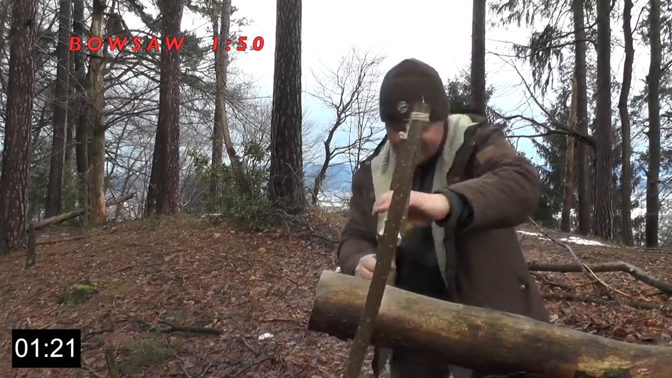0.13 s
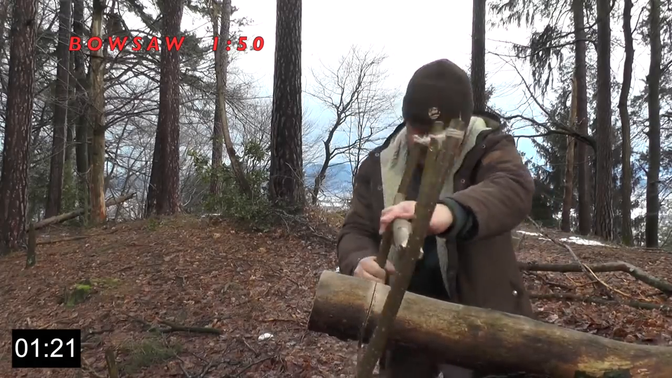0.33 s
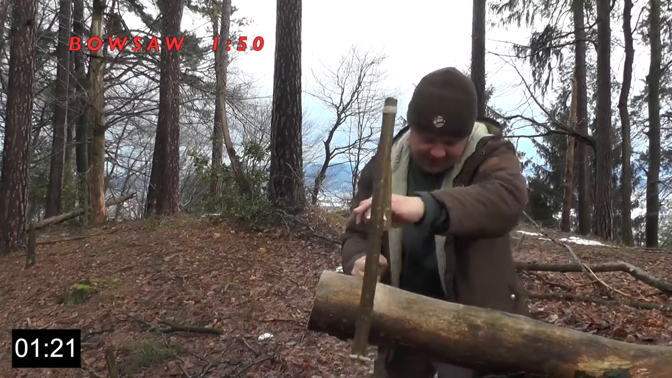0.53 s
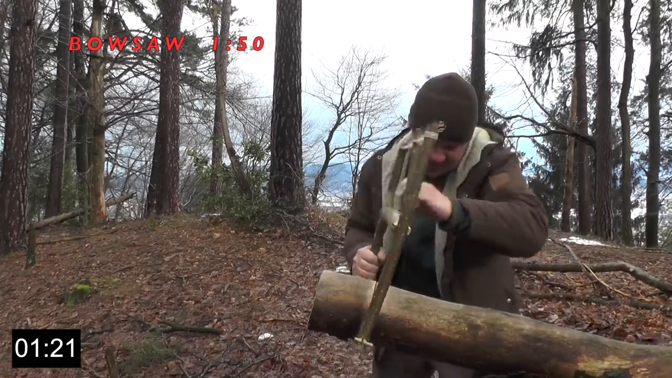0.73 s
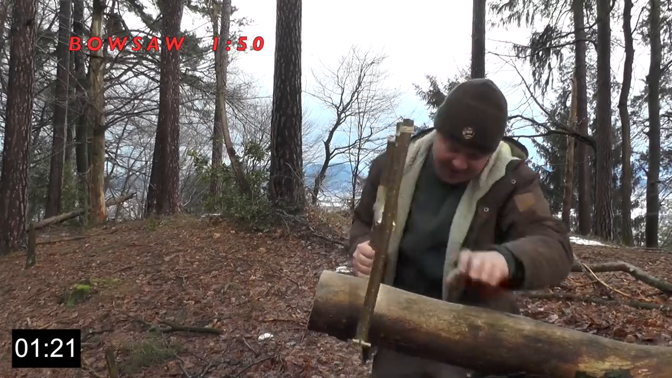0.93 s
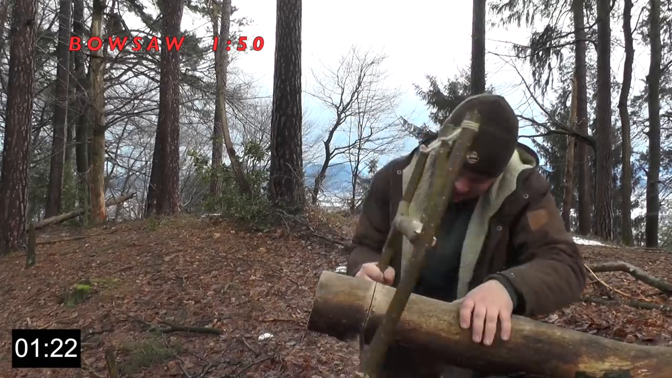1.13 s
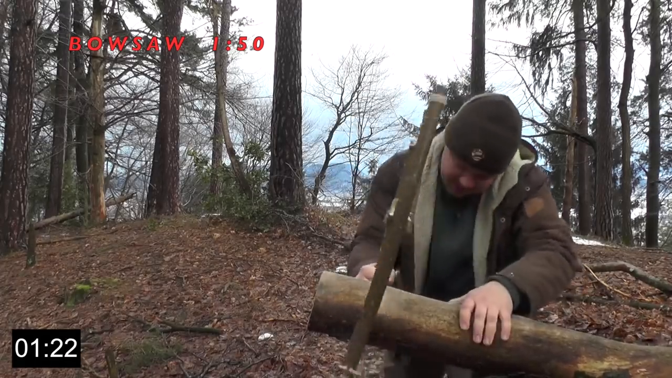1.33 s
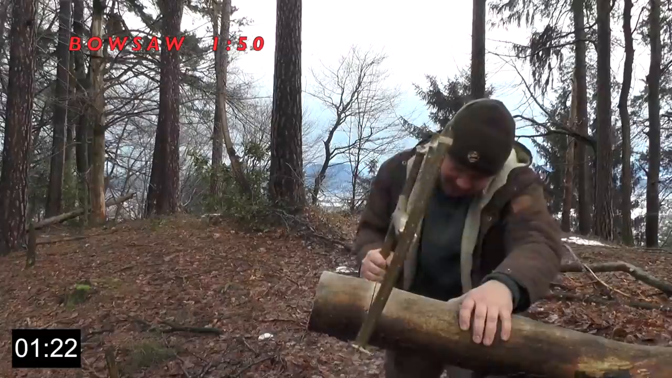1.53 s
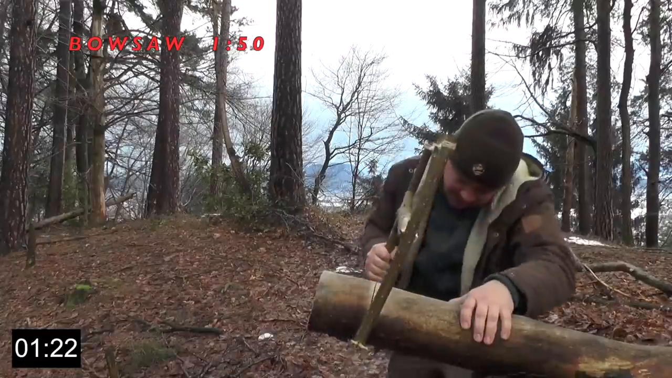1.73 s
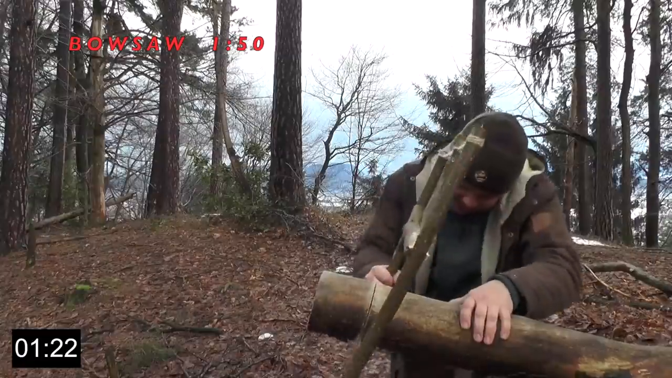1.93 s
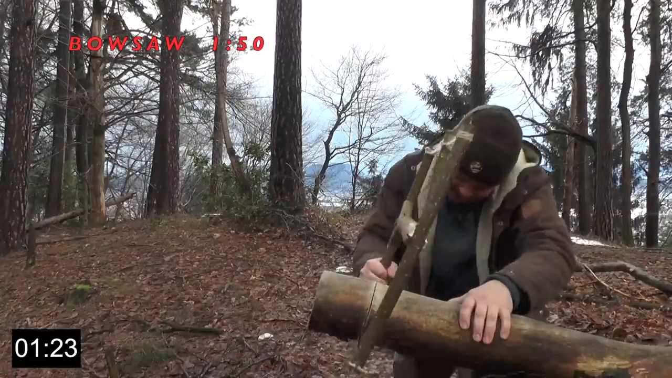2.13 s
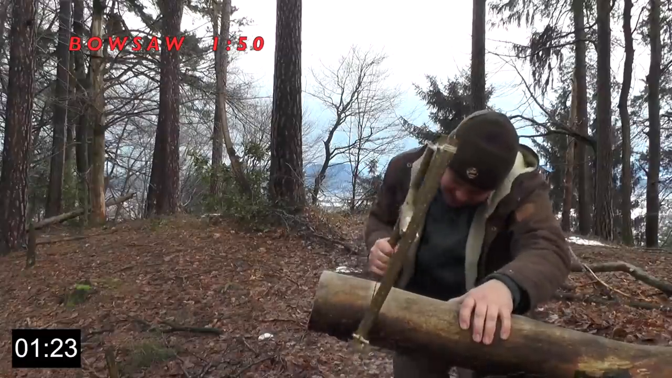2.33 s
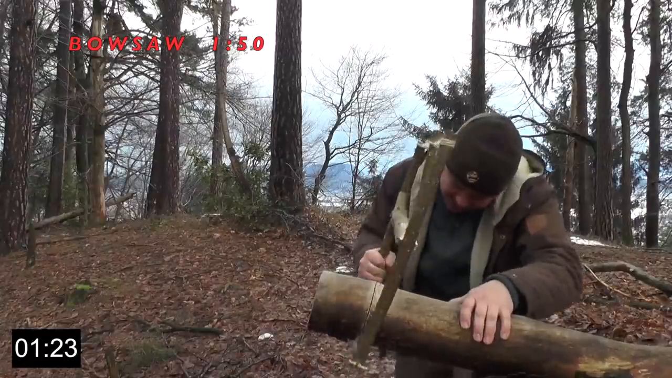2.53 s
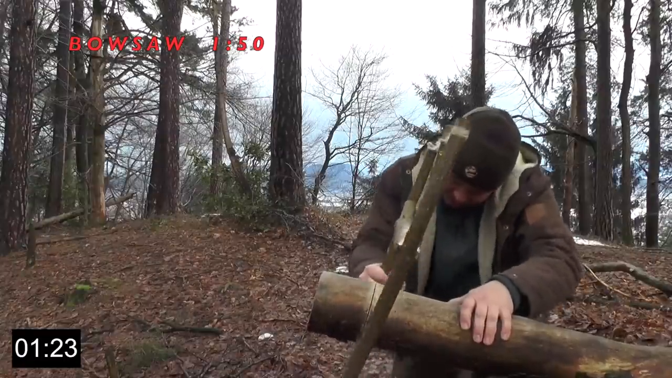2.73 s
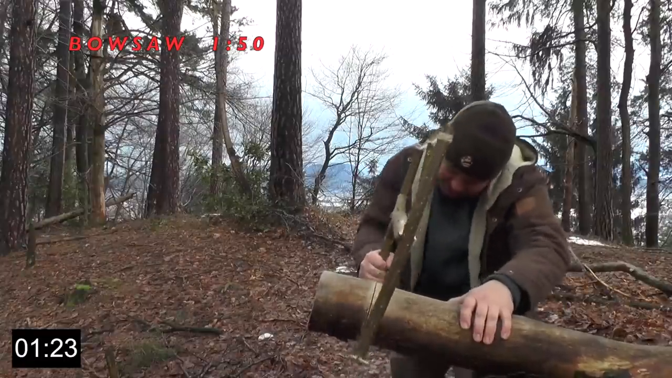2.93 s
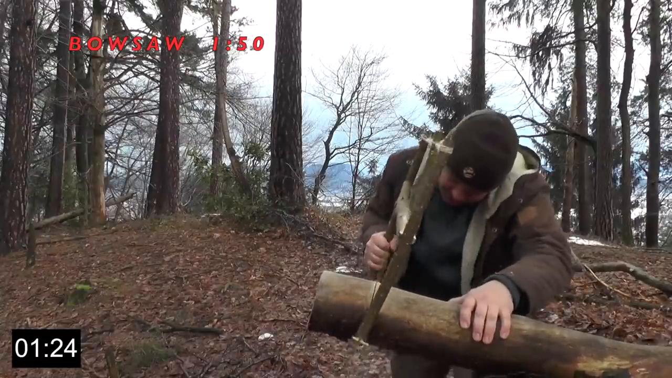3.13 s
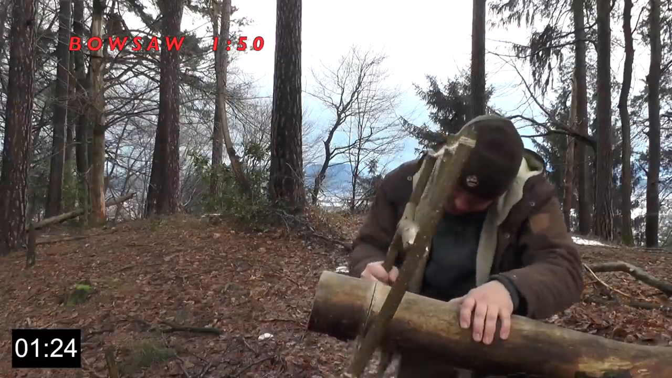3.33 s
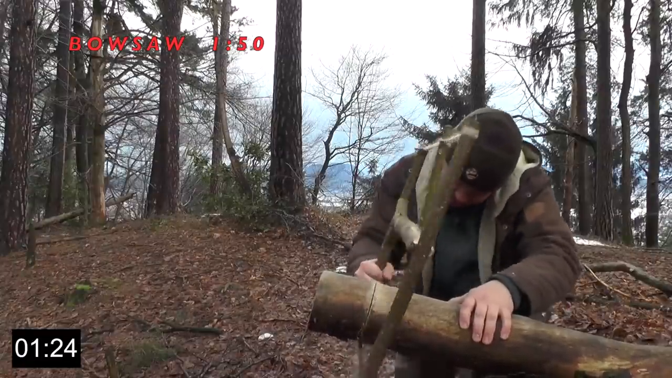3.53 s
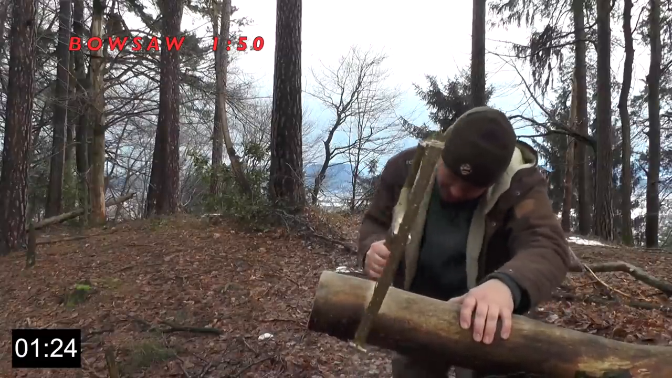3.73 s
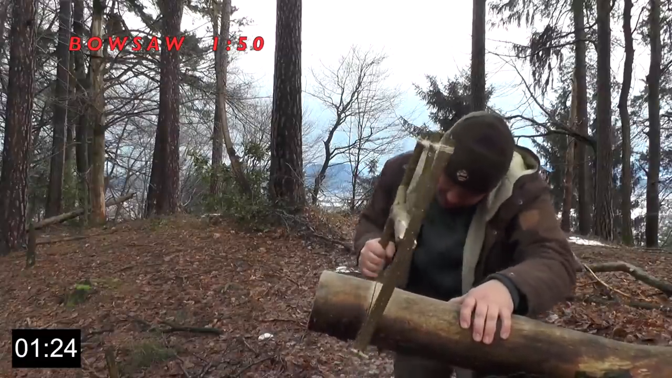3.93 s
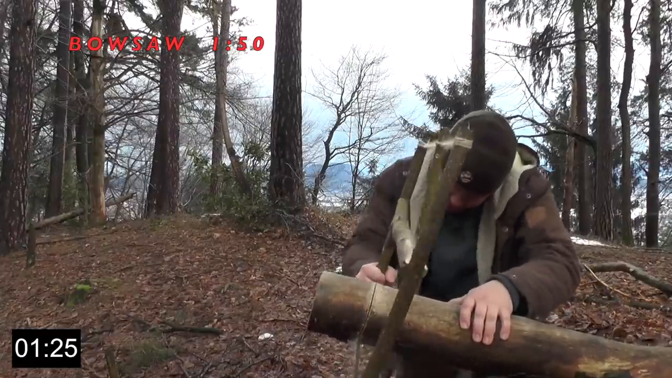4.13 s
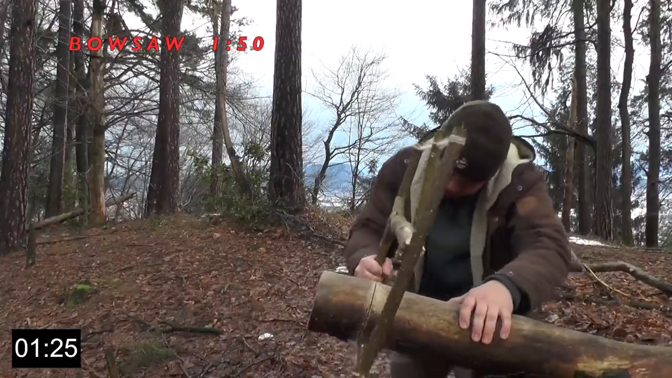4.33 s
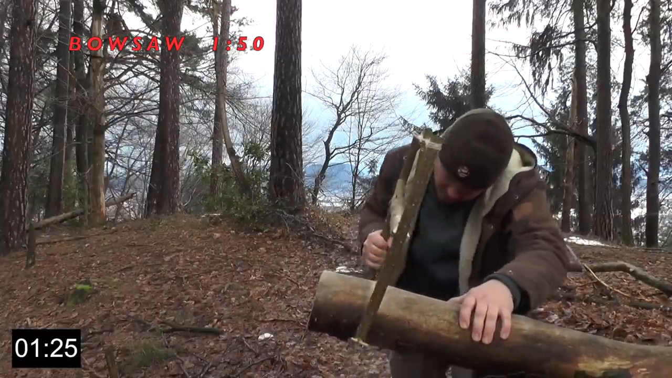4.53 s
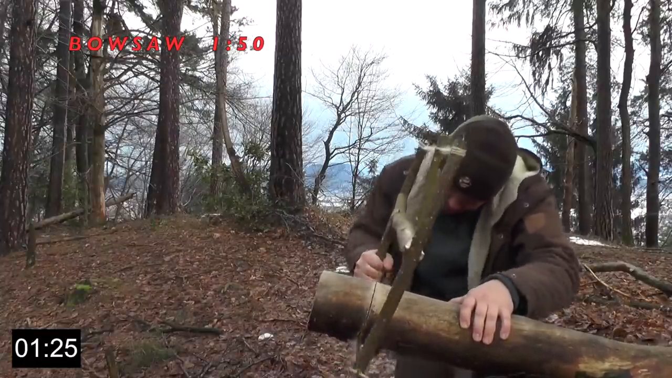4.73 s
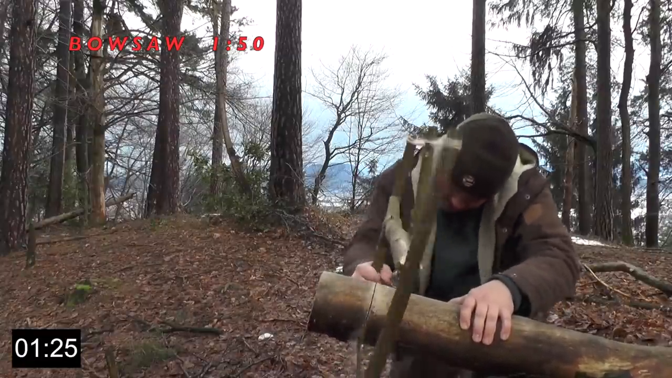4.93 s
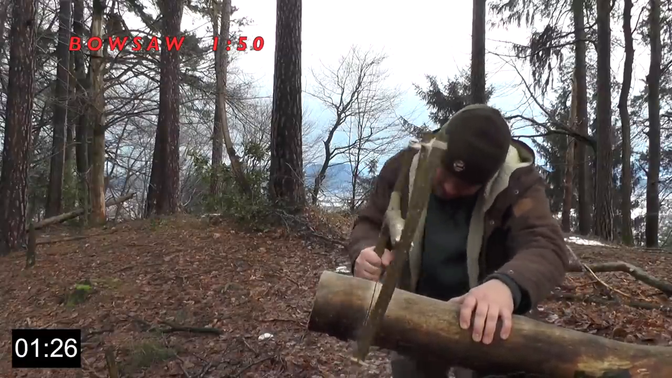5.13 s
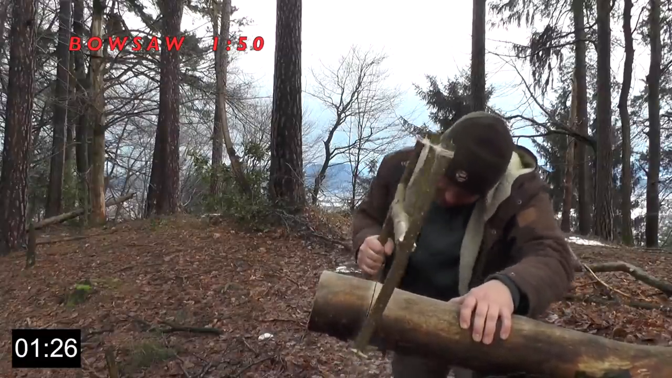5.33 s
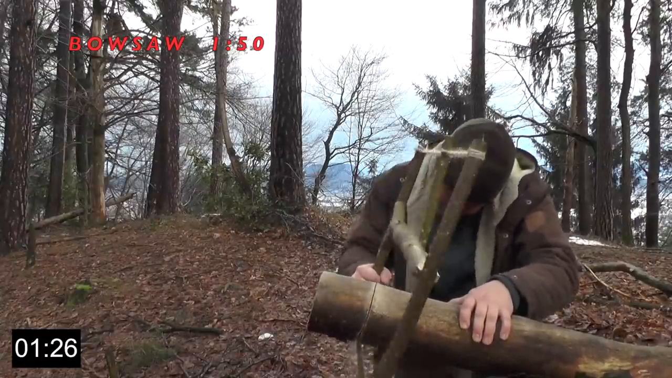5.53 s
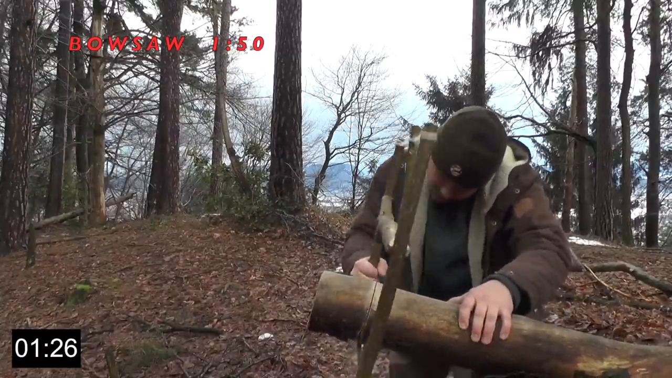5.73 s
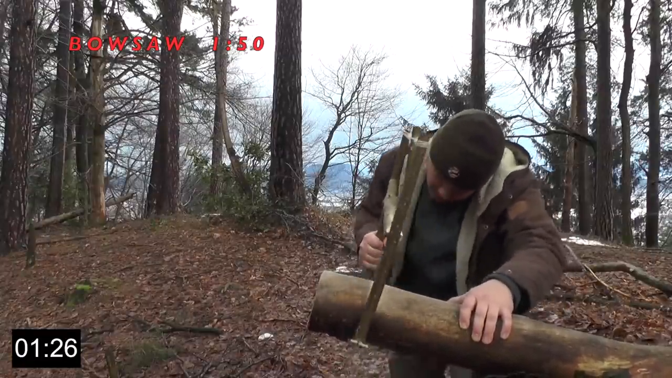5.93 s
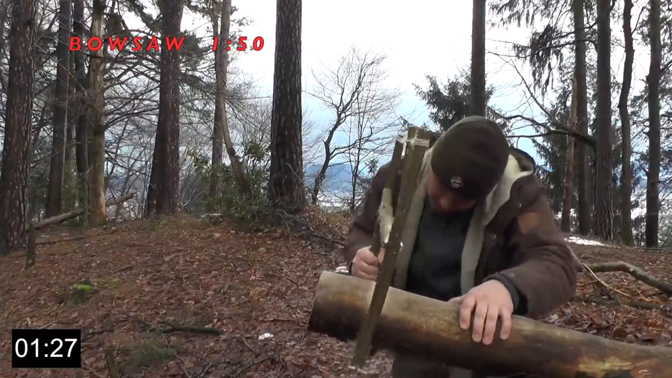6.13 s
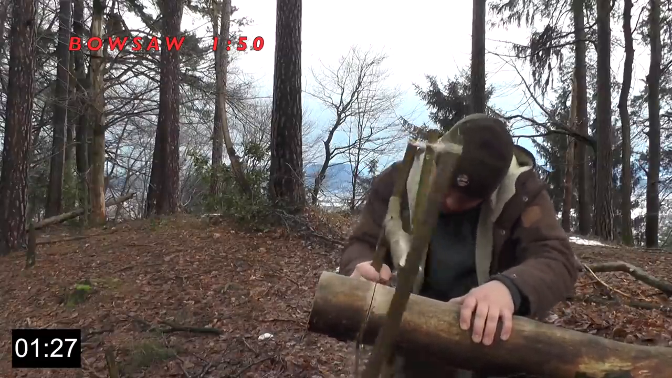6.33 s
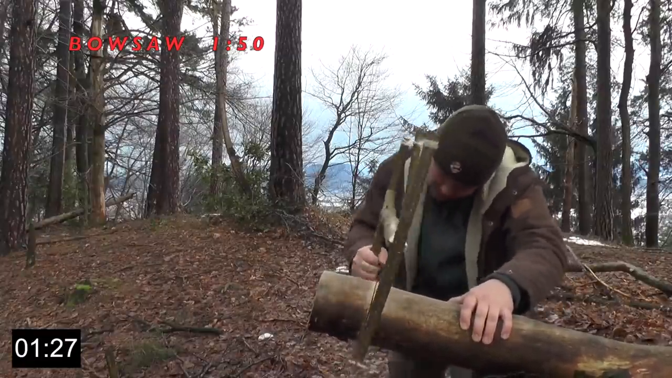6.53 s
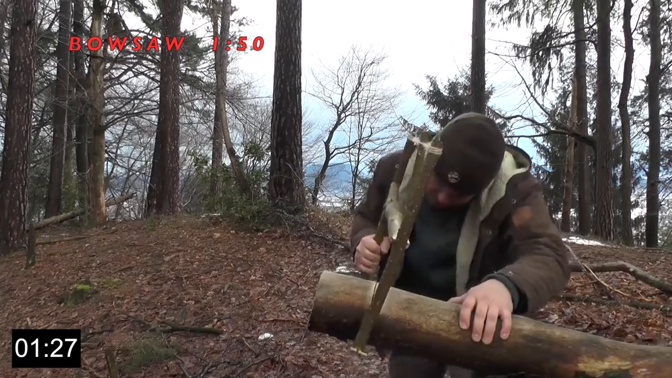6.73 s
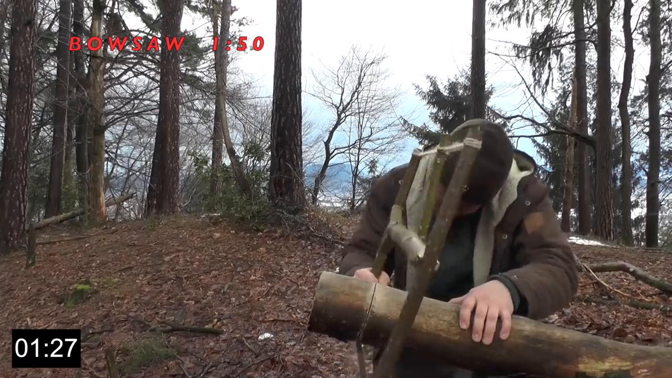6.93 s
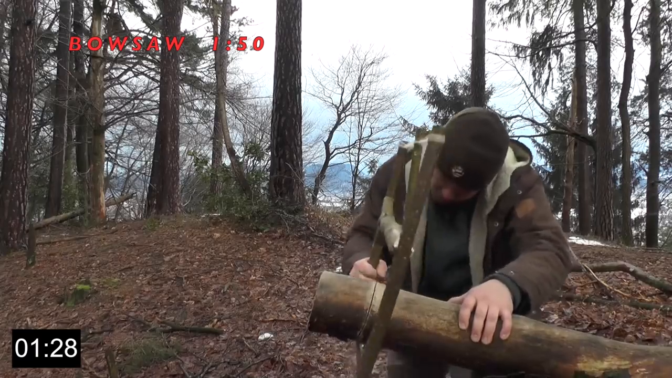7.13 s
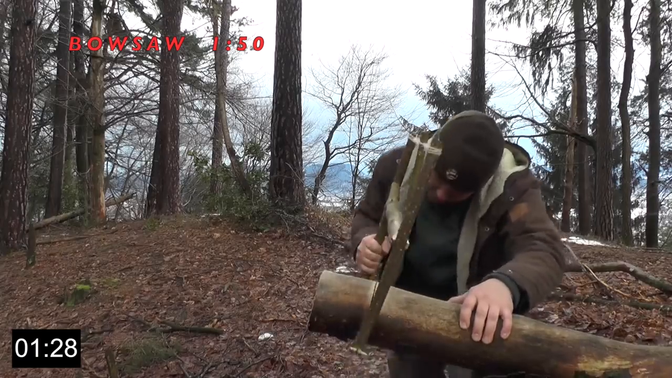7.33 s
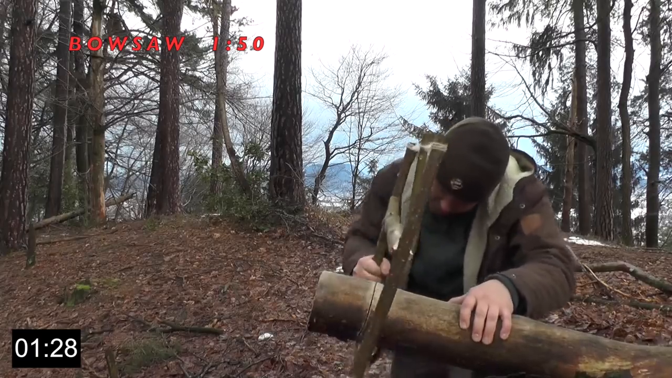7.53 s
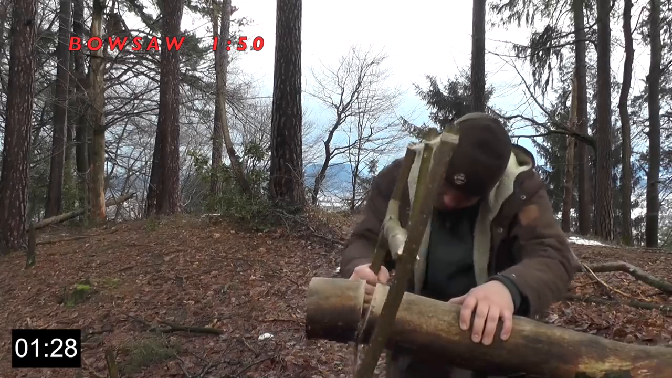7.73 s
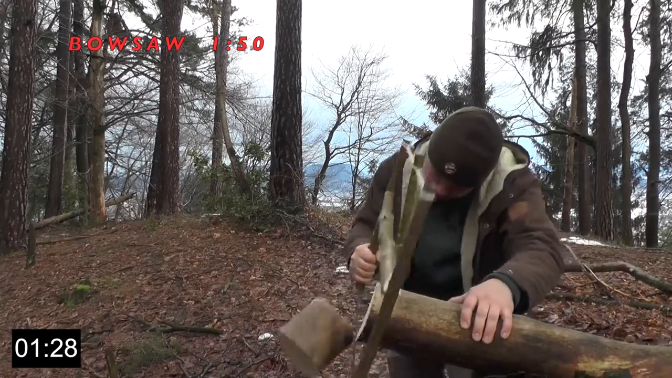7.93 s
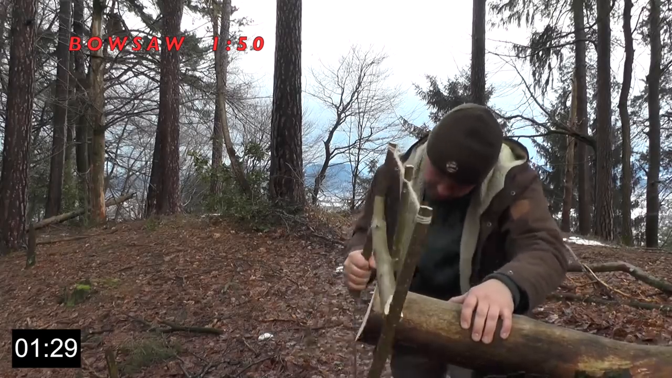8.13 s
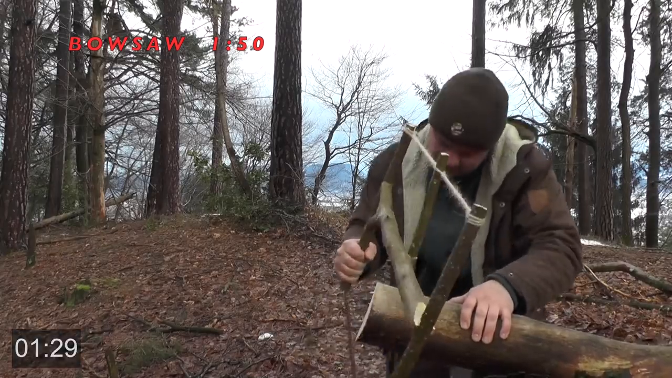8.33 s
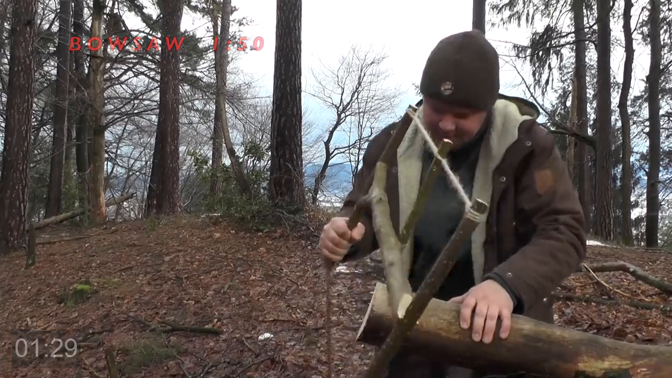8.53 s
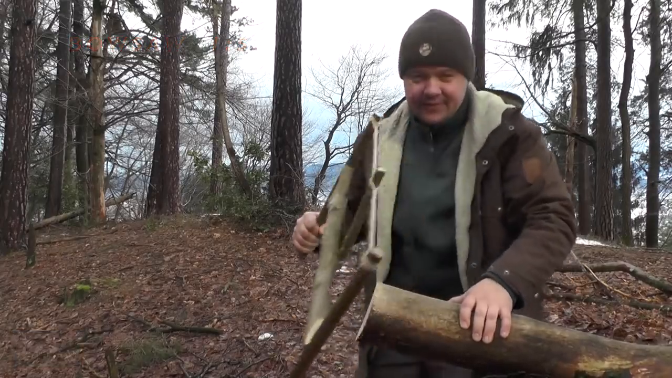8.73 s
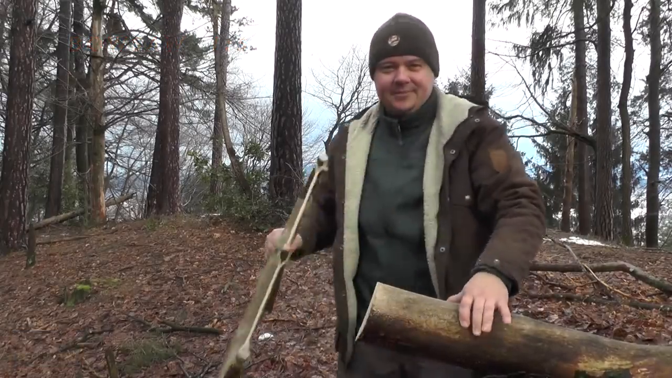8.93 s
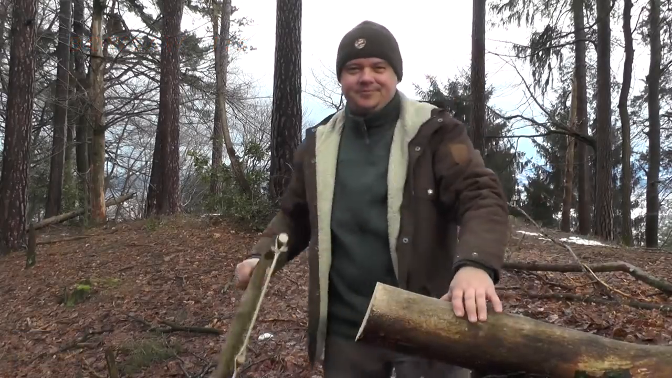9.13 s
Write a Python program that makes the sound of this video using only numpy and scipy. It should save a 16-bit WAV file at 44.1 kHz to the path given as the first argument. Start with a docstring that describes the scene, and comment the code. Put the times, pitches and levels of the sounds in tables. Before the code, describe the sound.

Close, steady wood sawing with even pushes and jerky returns, ending in a crack, a brief rattle and a woody thud among rustling leaves.

```python
"""Sawing a log in a quiet forest

A wooden-framed bucksaw cuts quickly through a log, heard close by over soft air noise and a faint echo.
Each push rasps evenly with some judder; each return bites in jerks and may end in a whistle or a knock.
The rasp is tiny noise grains, grouped tooth by tooth, sent through the resonances of blade and log.
The last fibres snap, the freed saw rattles, and the offcut thumps into dry leaves, bounces and rolls:
its blows are fading tones for the wood and shaped noise for fibres, leaves and ground."""
import sys
import numpy as np
from scipy import signal
from scipy.fft import rfft, irfft, next_fast_len
from scipy.io import wavfile
from scipy.ndimage import map_coordinates

SR = 44100
rng = np.random.default_rng(int(sys.argv[2]) if len(sys.argv) > 2 else 0)


def generate_wav(signal):
    """Clip the signal to [-1, 1] and save it as 16-bit WAV at the path in sys.argv[1]."""
    frames = np.transpose(np.atleast_2d(signal))
    scaled = np.clip(frames, -1, 1) * 32767
    pcm = np.round(scaled).astype(np.int16)
    wavfile.write(sys.argv[1], SR, pcm)


N = 405058
TIME = np.arange(N) / SR

# The cutting strokes. Each row: start, end, attack and release in seconds, blade level in dB,
# log level in dB, judder base rate in Hz, judder level in dB, zing level in dB.
PUSH_STROKES = [(0.944, 1.303, 0.13, 0.092, -21, -19.5, 255, -45, -42),
                (1.727, 2.032, 0.13, 0.096, -21.5, -16.5, 248, -32, -39),
                (2.438, 2.759, 0.13, 0.1, -21.5, -18, 238.3, -32, -36),
                (3.183, 3.482, 0.11, 0.065, -24, -18.5, 228, -18, -38),
                (3.899, 4.225, 0.14, 0.071, -20.5, -18.5, 226, -26, -35.5),
                (4.624, 4.981, 0.11, 0.15, -19.5, -18, 211, -22.5, -35.5),
                (5.337, 5.644, 0.099, 0.081, -22, -17.5, 231, -19.5, -37),
                (6.049, 6.359, 0.11, 0.11, -21.5, -18, 244, -16, -33),
                (6.733, 7.059, 0.12, 0.091, -21.5, -18.5, 233.4, -26, -33),
                (7.433, 7.717, 0.097, .069, -20, -18, 242.8, -33, -49)]
# The return strokes, on which the teeth skip and bite. Each row: start, end, attack and release in seconds,
# first bite in seconds, first gap between bites in seconds, quickening per gap (no unit),
# dip between bites in dB, blade level in dB, log level in dB.
RETURN_STROKES = [(0.394, 0.948, 0.13, 0.25, 0.49, 0.1, 0.22, 5.5, -29.5, -26.5),
                  (1.348, 1.732, 0.043, 0.19, 1.407, 0.08, 0.11, 12.5, -22.0, -18),
                  (2.073, 2.456, 0.11, 0.17, 2.12, 0.083, 0.2, 6.5, -22.5, -19),
                  (2.808, 3.16, 0.079, 0.12, 2.86, 0.09, 0.3, 11.0, -23, -19.5),
                  (3.499, 3.873, 0.22, 0.09, 3.67, 0.09, 0.24, 5.5, -21.5, -18.5),
                  (4.275, 4.656, 0.066, 0.23, 4.41, 0.083, 0.21, 4.5, -20.5, -17.5),
                  (5.01, 5.333, 0.07, 0.16, 5.06, 0.075, 0.25, 3.0, -21.5, -17.5),
                  (5.7, 6.014, 0.077, 0.06, 5.767, 0.101, 0.573, 12.5, -23, -19),
                  (6.385, 6.733, 0.15, 0.083, 6.54, 0.095, 0.47, 11, -23.0, -20.5),
                  (7.104, 7.411, 0.066, 0.074, 7.1, 0.089, 0.22, 15, -23.5, -20.5),
                  (7.778, 7.994, 0.051, 0.17, 7.836, 0.081, 0.15, 5, -22, -19)]
# Resonances of the log. Each row: frequency in Hz, width in Hz, relative level in dB.
LOG_RESONANCES = [(160.6, 34, -13.5), (225.1, 24, 1), (391, 231, -0.5), (557, 85, 4), (693, 116, -1),
                  (915, 128, 2.5), (1126, 143, -7), (1365, 89, -6)]
# Ringing tones of the sawn wood. Each row: frequency in Hz, typical relative level in dB,
# basic time to fade by 60 dB in seconds.
WOOD_TONES = [(199.6, -11.5, 0.16), (251.6, -8.5, 0.12), (317, -5.5, 0.086), (417.5, 3, 0.042),
              (501, -6.5, 0.096), (580, -4.5, 0.031), (714, -1.5, 0.038), (910, -5.5, 0.034)]


def amp(db):
    """Turn decibels into a gain."""
    return 10 ** (np.asarray(db) / 20)


def unit(x):
    """Scale a sound to an average (rms) strength of 1."""
    return x / np.sqrt(np.mean(x ** 2) + 1e-20)


def along(points, hz):
    """Read a curve of (Hz, value) points on a logarithmic frequency axis."""
    f, v = np.transpose(points)
    return np.interp(np.log(hz + 1), np.log(f), v)


def swell(s, half, lean):
    """A bell-shaped swell, down to 1/e at s - half and s + half; lean makes it rise faster than it falls."""
    lag = TIME - s + lean * half
    width = half * (1 + lean * np.sign(lag))
    return np.exp(-np.minimum((lag / width) ** 2, 50))


def wobble(rate):
    """A smooth random curve through a given number of random points a second."""
    points = rng.standard_normal(int(N * rate / SR) + 4)
    return map_coordinates(points, [TIME * rate])


def filtered(x, response):
    """Multiply the spectrum of a sound by a function of frequency."""
    m = next_fast_len(N + SR // 2)
    hz = np.fft.rfftfreq(m, 1 / SR)
    return irfft(rfft(x, m) * response(hz), m)[:N]


def coloured(x, spectrum):
    """Shape a sound by a (Hz, dB) curve, at rms 1."""
    return unit(filtered(x, lambda hz: amp(along(spectrum, hz))))


def resonate(x, peaks):
    """Send a sound through a body that answers most strongly at its resonances, at rms 1."""
    def body(f):
        total = 0
        for k, (centre, width, db) in enumerate(peaks):
            damping = 1j * f * width
            # neighbouring resonances get opposite signs
            total = total + (-1) ** k * amp(db) * damping / (centre * centre - f * f + damping)
        return total
    return unit(filtered(x, body))


def grains(rate, spread_db):
    """Tiny fractures at random moments and of random size, rate of them a second."""
    happens = rng.random(N) < rate / SR
    size = rng.standard_normal(N) * amp(spread_db * rng.standard_normal(N))
    return unit(happens * size)


def shifting(x, depth_db):
    """Let random patches of a sound's spectrum grow and fade."""
    z = signal.stft(x, nperseg=1024)[2]
    places = np.indices(z.shape) / np.reshape([3, 4], (2, 1, 1))
    field = map_coordinates(rng.standard_normal(z.shape), places)
    return unit(signal.istft(z * amp(depth_db * field), nperseg=1024)[1][:N])


def ring(tones, attack, blur_hz=12):
    """One blow sets fading tones ringing, with peak 1; loose contact blurs their pitch."""
    t = np.arange(SR // 2) / SR
    y = np.zeros(len(t))
    for hz, db, t60 in tones:
        level = amp(db + rng.normal(0, 2.7) - 60 * t / t60)
        turns = hz * t + rng.random()
        drift = np.cumsum(rng.standard_normal(len(t))) * np.sqrt(2 * np.pi * blur_hz / SR)
        y += level * np.sin(2 * np.pi * turns + drift)
    y = y * (1 - np.exp(-t / attack))
    return y / np.abs(y).max()


def add(track, s, sound):
    """Mix a sound into the track at time s."""
    part = track[round(s * SR):][:len(sound)]
    part += sound[:len(part)]


def forest():
    """A soft, slightly restless wash of air in the trees, made from shaped noise."""
    # Loudness of the air. Each row: time in seconds, level in dB.
    air_levels = [(0, -44.5), (.9, -42.5), (2.1, -51.5), (7.7, -50), (8.15, -55.5), (9.18, -50.5)]
    # Tone colour of the air. Each row: frequency in Hz, relative level in dB.
    air_spectrum = [(25, -36), (60, -9), (110, -3), (170, -3), (440, -3), (700, -2), (1240, -7.5),
                    (2080, -6), (2840, -12), (3700, -10.5), (7400, -26.5), (10200, -40), (15500, -58)]
    s, db = np.transpose(air_levels)
    level = amp(np.interp(TIME, s, db, left=-120, right=-120))
    return level * amp(0.7 * wobble(7.5)) * coloured(rng.standard_normal(N), air_spectrum)


def trunks(x):
    """The trees scatter an echo, a fading tail of noise whose highest treble dies first."""
    # Fading of the echo. Each row: frequency in Hz, time to fade by 60 dB in seconds.
    echo_fading = [(150, 0.2), (1000, 0.23), (4000, 0.18), (12000, 0.15)]
    hz, t, z = signal.stft(rng.standard_normal(SR // 2), SR, nperseg=256)
    fade = amp(-60 * t / along(echo_fading, hz)[:, None])
    tail = signal.istft(z * fade, SR, nperseg=256)[1]
    return signal.fftconvolve(x, tail / np.linalg.norm(tail))[:N]


def offcut(ground_t60=0.32, stir_db=-2.0):
    """Each blow crunches fibres or leaves, rings the wood and shakes the soft ground."""
    # The offcut breaks away, lands and rolls. Each row: time in seconds, crunch level in dB,
    # crunch half length in seconds, wood peak in dB, ground level in dB.
    blows = [(7.912, -16.5, 0.0051, -22, -43), (8.026, -30, 0.0067, -17.5, -61),
             (8.064, -56, .005, -28, -69), (8.336, -19, .01, -29, -28.5),
             (8.513, -37, 0.0051, -11.5, -33.5), (8.548, -50, .005, -26, -40),
             (8.654, -33, 0.013, -27, -53), (8.671, -29.5, 0.0064, -33, -55), (8.728, -33, 0.027, -29, -48)]
    # Leaves stir under the offcut and boots. Each row: time in seconds, level in dB, half length in seconds.
    rustles = [(8.364, -45.5, 0.042), (8.513, -45, 0.039), (8.62, -49.5, 0.068), (8.73, -45.5, 0.081),
               (8.868, -46, 0.036), (8.93, -56.5, 0.056)]
    # Tone colours of crunch, leaves and ground. Each row: frequency in Hz, relative level in dB.
    crunch_spectrum = [(120, -53), (200, -19), (399, 2.5), (1070, -4.5), (1510, -5), (1880, -8),
                       (2090, -3.5), (5200, -16), (8050, -17), (10200, -28), (15500, -39)]
    leaf_spectrum = [(300, -8.5), (1200, -2.5), (2400, -7), (3100, -0.5), (4400, -4), (6000, -11),
                     (8500, -11), (10000, -29), (13000, -21), (15500, -36)]
    ground_spectrum = [(18, -32), (34, -19), (50, 5.5), (75, -13), (130, 0.5), (220, -13), (600, -35.5)]

    wood, crunch, shake = np.zeros((3, N))
    for s, crunch_db, half, wood_db, ground_db in blows:
        age = np.maximum(TIME - s, 0)
        add(wood, s, amp(wood_db) * ring(WOOD_TONES, attack=0.0022))
        crunch += amp(crunch_db) * swell(s, half, lean=0.077)
        shake += amp(ground_db - 60 * age / ground_t60) * (1 - np.exp(-age / 0.0089))
    stirring = sum(amp(db) * swell(s, half, lean=0.22) for s, db, half in rustles)
    crackle = shifting(grains(rate=3000, spread_db=3), depth_db=2.5)
    leaves = stirring * amp(5.5 + stir_db * wobble(51)) * coloured(crackle, leaf_spectrum)
    ground = shake * coloured(rng.standard_normal(N), ground_spectrum)
    fibres = crunch * coloured(grains(rate=14000, spread_db=0.5), crunch_spectrum)
    return wood + ground + leaves + fibres


def jolt(start_s=8.026, db=-17, t60=0.14, bright_t60=0.038, edge_hz=1100):
    """The freed saw rattles briefly as it jolts out of the cut, its treble dying first."""
    # Resonances of the freed saw. Each row: frequency in Hz, width in Hz, relative level in dB.
    free_saw = [(289, 89, -12), (452, 67, -4), (810, 120, -9.5), (1840, 240, -10), (3380, 260, -8.5),
                (4450, 440, -17), (6760, 380, -36)]
    age = np.maximum(TIME - start_s, 0)
    rattle = resonate(grains(rate=5700, spread_db=3.5), free_saw)
    low = filtered(rattle, lambda hz: 1 / (1 + (hz / edge_hz) ** 4))
    fading = low * amp(-60 * age / t60) + (rattle - low) * amp(-60 * age / bright_t60)
    return amp(db) * (1 - np.exp(-age / 0.00054)) * fading


def knocks(lowest_hz=230):
    """The frame bumps the log, mostly late in a return, and both ring."""
    # The bumps. Each row: time in seconds, frame peak in dB, wood thud peak in dB (before the bass is thinned).
    bumps = [(2.385, -10, -17.5), (3.112, -5, -14.5), (3.839, -7.5, -12), (4.458, -18, -9.5),
             (4.58, -19, -15.5), (5.984, -13.5, -11)]
    # Ringing tones of the frame. Each row: frequency in Hz, typical relative level in dB,
    # time to fade by 60 dB in seconds.
    frame_tones = [(196, 6.5, 0.012), (756, -11, 0.035), (860, -8, 0.056), (1026, 2.5, 0.031),
                   (1076, -0.5, 0.027), (1380, -18, 0.031), (2220, -14.5, .015)]
    out = np.zeros(N)
    longer_wood = [(hz, db, t60 * 1.33) for hz, db, t60 in WOOD_TONES]  # rings a third longer here
    for s, db, thud_db in bumps:
        add(out, s, amp(db) * ring(frame_tones, attack=0.00092))
        add(out, s, amp(thud_db) * ring(longer_wood, attack=0.00034))
    # the bass of both frame and wood thud is thinned
    return signal.lfilter(*signal.butter(2, lowest_hz, "high", fs=SR), out)


def whistles(start_hz=1380, sag_hz_per_s=1500, half_s=0.057, waver=.025, flutter_db=3.0):
    """The blade whistles on a wavering, sinking note as a return slows to a stop."""
    # The whistles. Each row: middle in seconds, typical level in dB.
    whistle_times = [(1.689, -43.5), (4.61, -42.5)]
    out = np.zeros(N)
    for s, db in whistle_times:
        hz = (start_hz - sag_hz_per_s * (TIME - s)) * (1 + waver * wobble(400))  # start_hz is met at s
        tone = np.sqrt(2) * np.sin(2 * np.pi * np.cumsum(hz) / SR)
        out += amp(db + flutter_db * wobble(140)) * swell(s, half_s, lean=0) * tone
    return out


def zings(chatter_hz=100, push_delay_s=0.054, push_hz=4610, push_half_s=.04):
    """Short chattering noise bursts pluck one resonance of the slow blade near the turns."""
    # Stray plucks as a return begins. Each row: time in seconds, frequency in Hz, level in dB,
    # half length in seconds.
    stray_plucks = [(0.452, 2370, -30, .007), (0.452, 4600, -36.5, 0.0053), (0.523, 2270, -35, 0.018),
                    (3.497, 2250, -35, 0.0063), (3.498, 3050, -36, 0.0062), (3.595, 3015, -36.5, .035)]
    out = np.zeros(N)
    chatter = np.cumsum(chatter_hz * (1 + 0.14 * wobble(47))) / SR
    plucks = np.exp(-2 * (chatter % 1)) * rng.standard_normal(N)
    on_pushes = [(start + push_delay_s, push_hz, zing_db, push_half_s) for start, *_, zing_db in PUSH_STROKES]
    for s, hz, db, half in on_pushes + list(stray_plucks):
        b, a = signal.iirpeak(hz, 11, SR)
        singing = signal.lfilter(b, a, signal.lfilter(b, a, plucks))  # twice, for a purer note
        out += amp(db) * swell(s, half, lean=0.42) * unit(singing)
    return out


def judder(place=.55, half=.05, slowing=0.059, jitter=0.036, edge_hz=700):
    """Just past mid-push the teeth hop in step through the cut, at an arching rate, and the log answers."""
    hops, level = np.zeros(N), np.zeros(N)
    unsteady = 1 + jitter * wobble(90)
    for start, end, *_, hz, db, zing_db in PUSH_STROKES:
        s = start + place * (end - start)
        near = np.abs(TIME - s) < 2 * half
        rate = hz * unsteady[near] * (1 - slowing * ((TIME[near] - s) / half) ** 2)
        hops[near] = np.diff(np.floor(np.cumsum(rate) / SR), prepend=0)  # one click per hop
        level += amp(db) * swell(s, half, lean=0.041)
    body = resonate(hops * amp(2 * wobble(120)), LOG_RESONANCES)
    body = filtered(body, lambda hz: 1 / (1 + (hz / edge_hz) ** 2))
    return level * body / np.sqrt(np.average(body ** 2, weights=level))


def teeth_passed(push_hz=235, return_hz=205, slowest_hz=70):
    """Running count of teeth through the cut; their rate arches with the speed of the arm."""
    rate = np.full(N, float(slowest_hz))
    strokes = [(row[0], row[1], push_hz) for row in PUSH_STROKES]
    strokes += [(row[0], row[1], return_hz) for row in RETURN_STROKES]
    for start, end, hz in strokes:
        inside = (TIME > start) & (TIME < end)
        arch = np.sin(np.pi * (TIME[inside] - start) / (end - start)) ** .7
        rate[inside] = np.maximum(slowest_hz, hz * arch)
    return np.cumsum(rate * (1 + .03 * wobble(35))) / SR


def repeated(x, teeth, likeness, count=3):
    """Each tooth meets the same ridges as the teeth before it, so the rasp gains gliding harmonics."""
    total = x
    for k in range(1, count + 1):
        earlier = x[np.searchsorted(teeth, teeth - k)]  # the sound of k teeth ago
        total = total + likeness ** k * earlier
    return unit(total)


def ramps(start, end, attack, release):
    """Attack, hold and release of one stroke, from 0 to 1."""
    rise = np.clip(np.minimum((TIME - start) / attack, (end - TIME) / release), 0, 1)
    return np.sin(np.pi / 2 * rise)


def stroke(start, end, attack, release, linger_s=0.0032, ease_s=0.012):
    """One stroke's drive on blade and log; the log sounds on longer and swells and fades more gently."""
    blade = ramps(start, end, attack, release) ** 2.42  # the powers curve the rise and fall
    log = ramps(start, end + linger_s, attack + ease_s, release + ease_s) ** 2.01
    return np.array([blade, log])


def skipping(first, gap, quicken, fade=0.32, skew=1.94, narrow=1.42):
    """How far the teeth lift between bites (0-1): the blade bounces ever faster and lower."""
    age = np.maximum(TIME - first, -gap) / gap  # counted in first gaps
    cycle = (age + quicken * age * np.abs(age)) % 1
    # skew makes each bite set in sharply; a lower narrow makes shorter bites
    return np.exp(-fade * np.abs(age)) * np.sin(np.pi * cycle ** skew) ** narrow


def stroke_force(log_dip=1.52, bite_lift=0.1, first_bite_db=-1.5):
    """How hard the teeth drive blade and log: evenly on a push, in jerks on a return."""
    force = np.zeros((2, N))
    for start, end, attack, release, blade_db, log_db, *_ in PUSH_STROKES:
        force += amp([[blade_db], [log_db]]) * stroke(start, end, attack, release)
    for start, end, attack, release, first, gap, quicken, depth_db, blade_db, log_db in RETURN_STROKES:
        # bites gain back a share (bite_lift) of the dip between them
        dip_db = depth_db * (skipping(first, gap, quicken) - bite_lift)
        # the first bite is made lighter
        dip_db = dip_db - first_bite_db * np.clip(2 * (first - TIME) / gap + 1, 0, 1)
        levels_db = [blade_db - dip_db, log_db - log_dip * dip_db]
        force += amp(levels_db) * stroke(start, end, attack, release)
    return force


def deepening(log, low_hz=208, width_hz=40, loosen_s=2.7):
    """A shallow cut leaves the log's end stiff and mutes its low ring, which comes out by loosen_s."""
    stiffness = np.clip(1 - (TIME / loosen_s) ** 3, 0, 1)
    low_ring = filtered(log, lambda hz: np.exp(-((hz - low_hz) / width_hz) ** 2))
    return log - 0.7 * stiffness * low_ring


def sawing(tear_s=0.0078, tooth_scatter_db=2.5, rub=1.0, dull_db=-48):
    """Tooth after tooth tears a burst of fibres; blade and log both ring with it."""
    # Resonances of the blade. Each row: frequency in Hz, width in Hz, relative level in dB.
    blade_resonances = [(1665, 392, -10), (1996, 205, -3.5), (2390, 198, -6), (3093, 119, -5.5),
                        (3270, 940, -14), (4610, 1020, -13.5), (6810, 720, -22.5), (8427, 636, -21),
                        (10770, 224, -30), (12450, 1460, -31), (15700, 500, -47)]
    blade_force, log_force = stroke_force()
    teeth = teeth_passed()
    age = (teeth % 1) / (np.gradient(teeth) * SR)  # seconds since the latest tooth
    depth = amp(tooth_scatter_db * rng.standard_normal(N))[teeth.astype(int)]  # each tooth bites differently
    snags = amp(1.4 * wobble(100))
    tearing = snags * (rub + depth * np.exp(-age / tear_s))
    fine = repeated(grains(rate=10000, spread_db=2), teeth, likeness=.5)
    coarse = repeated(grains(rate=4000, spread_db=1.5), teeth, likeness=.6)
    # random patches of the rasp's spectrum grow and fade before the fixed resonances of blade and log
    blade = resonate(shifting(tearing * fine, depth_db=2.2), blade_resonances)
    log = resonate(shifting(tearing * coarse, depth_db=2.5), LOG_RESONANCES)
    # slow teeth rub more than they tear, so the hiss is dull at the turns
    bright = blade_force / (blade_force + amp(dull_db))
    dull = filtered(blade, lambda hz: 1 / (1 + (hz / 5200) ** 8))
    hiss = dull + 1.27 * bright * (blade - dull)
    return blade_force * hiss + log_force * deepening(log)


def scene():
    """Saw and offcut close by, the forest and its faint echo around them."""
    near = offcut() + jolt() + knocks() + whistles() + zings() + judder() + sawing()
    return (near + amp(-17.5) * trunks(near) + forest())[None]


def record(dry, lowest_hz=32, top_hz=15900):
    """Thin the deepest bass and keep nothing above the top frequency."""
    thinned = signal.lfilter(*signal.butter(3, lowest_hz, "high", fs=SR), dry[0])
    return filtered(thinned, lambda hz: hz < top_hz)[None]


dry = scene()
out = record(dry)
generate_wav(out)
```